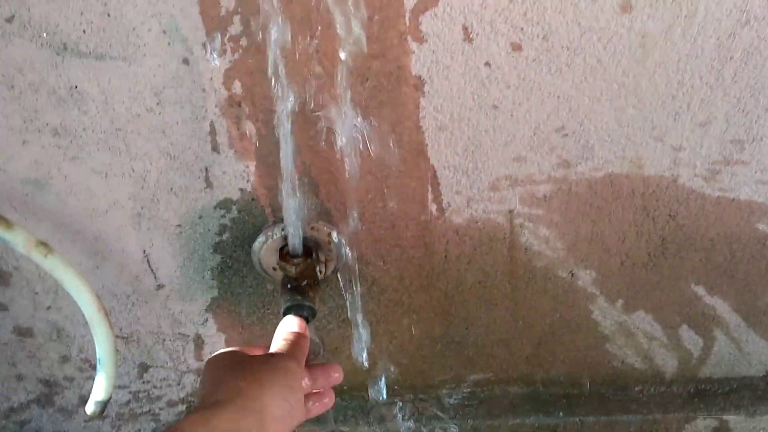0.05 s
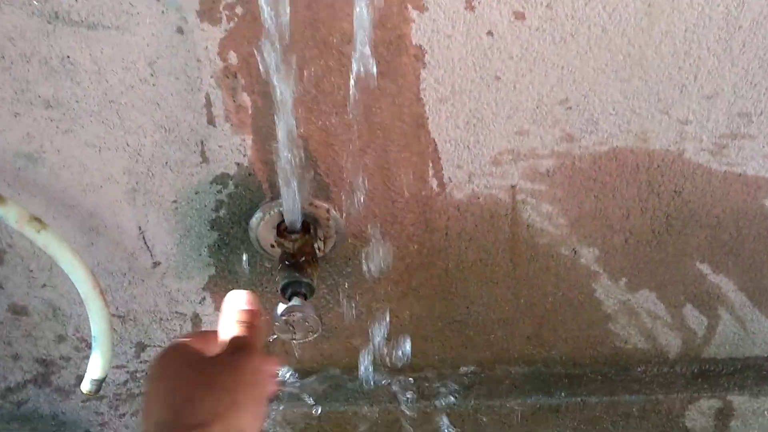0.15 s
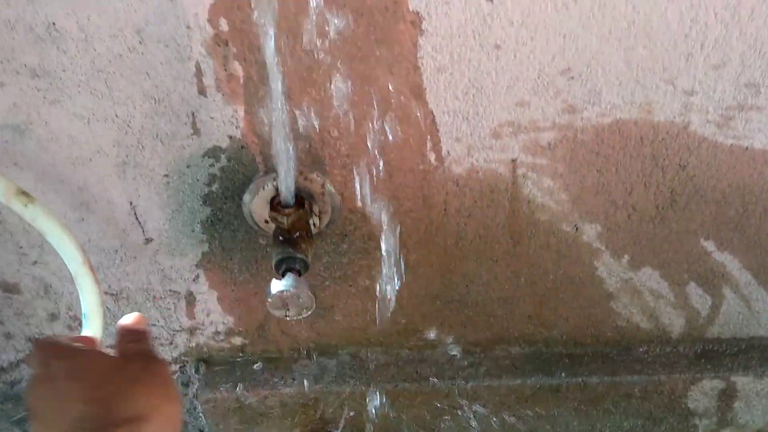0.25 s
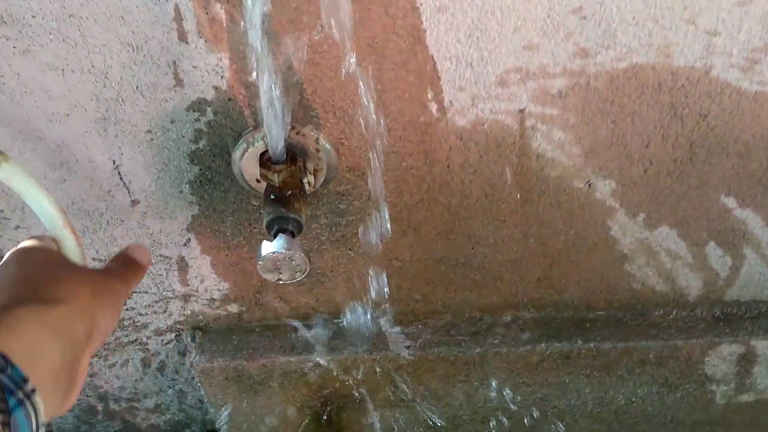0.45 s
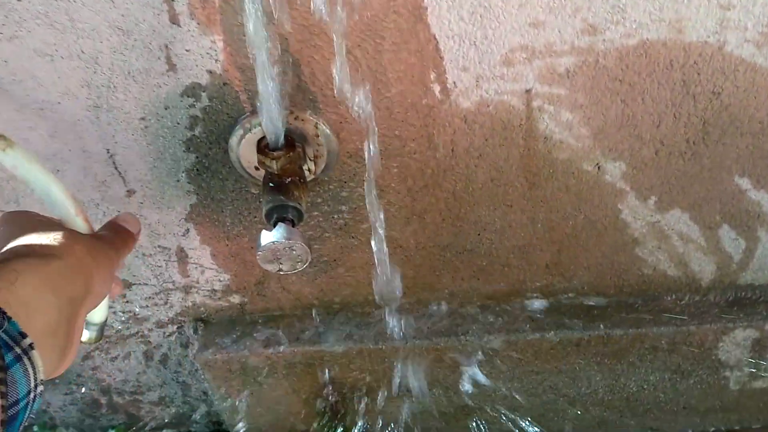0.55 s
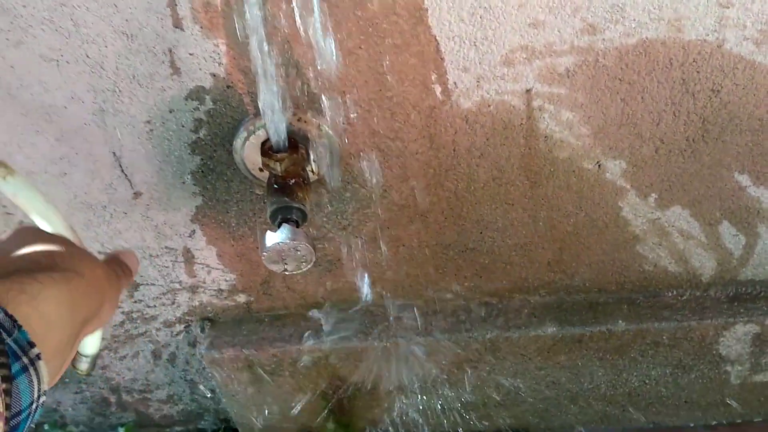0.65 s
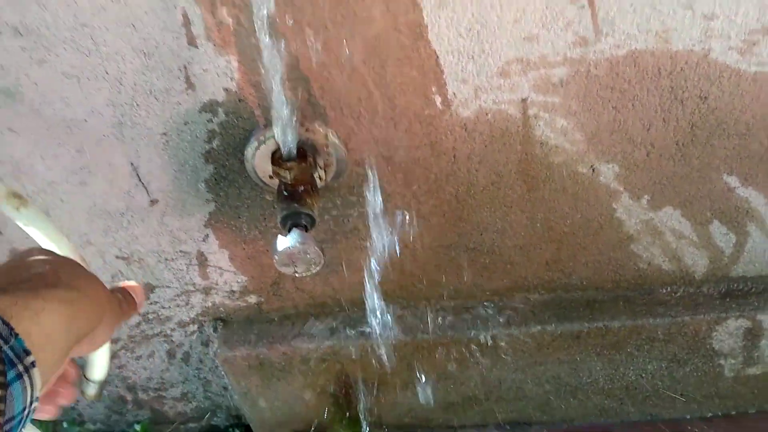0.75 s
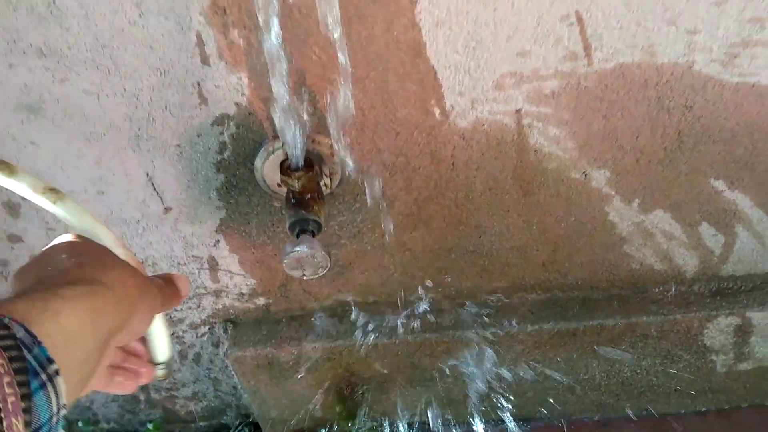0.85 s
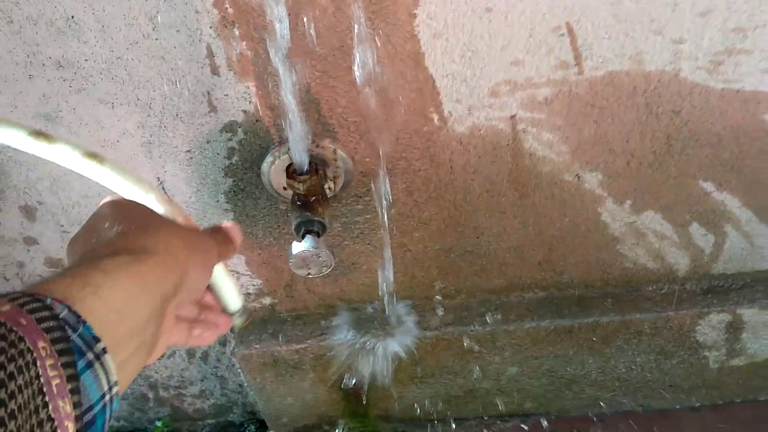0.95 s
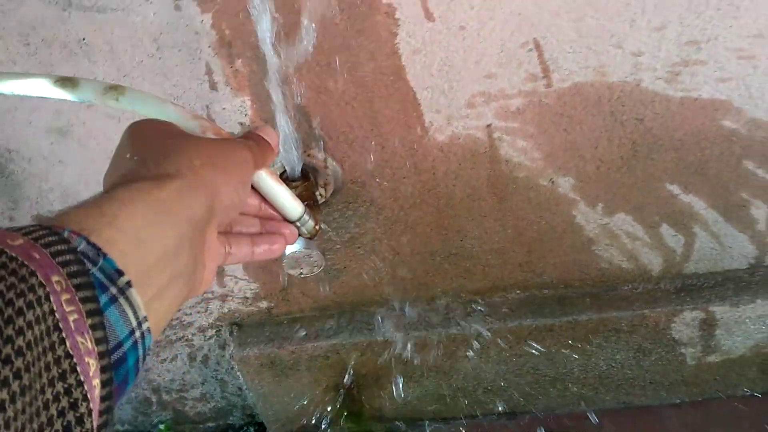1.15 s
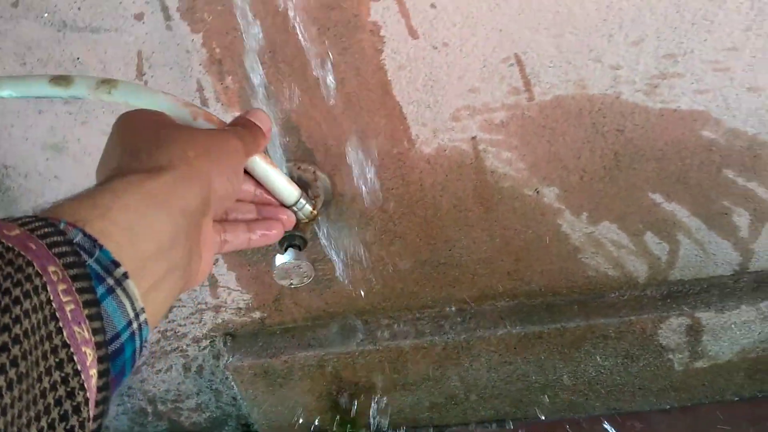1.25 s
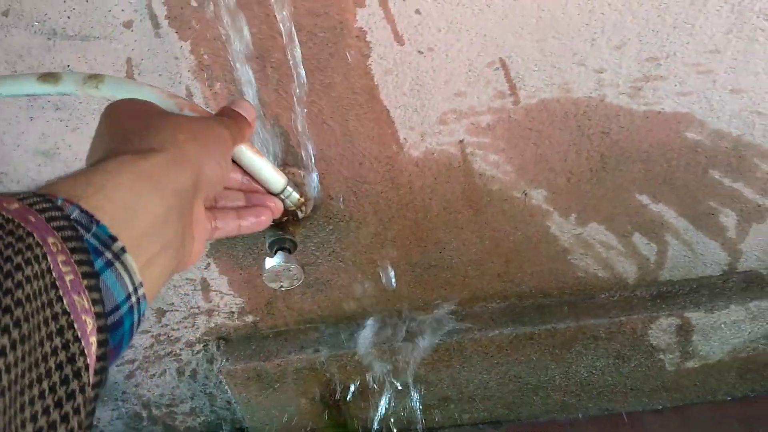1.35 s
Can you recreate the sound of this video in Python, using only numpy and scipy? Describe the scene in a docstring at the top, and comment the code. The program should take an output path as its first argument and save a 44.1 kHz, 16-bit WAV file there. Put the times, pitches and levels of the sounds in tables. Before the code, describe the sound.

Close by and a little to the right, water from an outdoor tap splashes onto concrete in quick, irregular spurts. Droplets patter and a thin trickle runs between the splashes, with a short yard echo and faint low rumble.

```python
"""In a small hard yard, water spurts unevenly from a wall tap onto a concrete ledge, a little to the right.
Each slug lands with sharp slaps and a soft thud and scatters droplets; trapped air rings as plops.
A thin trickle runs throughout, and stray drops land further right. A hard surface nearby throws each
slap back, and walls and ground reverberate. A low rumble and a faint tone lie underneath."""
import sys
import numpy as np
from scipy import signal
from scipy.fft import irfft
from scipy.io import wavfile

SR = 44100
rng = np.random.default_rng(int(sys.argv[2]) if len(sys.argv) > 2 else 0)


def to_wav(s):
    """Save 16-bit WAV."""
    ch = np.atleast_2d(s).T  # columns
    pcm = np.round(np.clip(ch, -1, 1) * 32767)  # PCM
    wavfile.write(sys.argv[1], SR, pcm.astype(np.int16))


N = 61739

# Levels in the tables are relative: gains and filters follow.
# spectrum of the background rumble: f/Hz, level/dB
RUMBLE_SPECTRUM = [(25, -50), (60, -53), (90, -13.5), (130, 4.5), (190, -16), (300, -27.5), (550, -12.5),
                   (900, -24.5), (2000, -26), (16000, -65)]
# envelope of the unbroken trickle: t/s, level/dB
TRICKLE_ENVELOPE = [(0, -60.5), (.07, -72.5), (.14, -62), (.41, -64.5), (.52, -56), (.69, -49.5),
                    (.81, -56), (.99, -68.5), (1.28, -61.5), (1.4, -68)]
# filter that colours the droplet ticks: f/Hz, level/dB
DROPLET_SPECTRUM = [(200, -21), (550, -12), (1200, -17), (2000, -1.5), (3500, -1), (4400, 4.5), (7900, 1.5),
                    (8800, -10.5), (16000, -20.5)]
# stray drops landing further right: t/s, level/dB, f/Hz
STRAY_DROPS = [(.0105, -37, 6610), (.0205, -34, 5870), (.0947, -37.5, 5320), (.1493, -31.5, 5150),
               (.5422, -26, 5180), (.8442, -37.5, 5900), (.885, -31, 5730), (.889, -30.5, 6800),
               (1.1915, -20.5, 6490), (1.2438, -28, 4730), (1.2795, -25.5, 4350)]
# spectrum of the crackle in an impact: f/Hz, level/dB
SPLASH_SPECTRUM = [(150, -33), (800, -13), (2000, -7.5), (3050, 8.5), (3600, -14), (4300, 1.5),
                   (5800, -1.5), (7900, -9), (12500, -10.5), (16000, -47)]
# bright spits of mist: t/s, level/dB
MIST_SPITS = [(.0947, -50.5), (.222, -39.5), (.305, -33), (.456, -31), (.570, -40), (.619, -37),
              (.628, -50), (.889, -42.5), (1.2438, -41)]
# sheets of spray: t/s, time until fading/s, level/dB, right minus left/dB
SPRAY_SHEETS = [(0.154, 0.082, -59.5, 14), (0.2, 0.045, -43, 4.5), (0.245, .016, -34, 1.5),
                (0.292, 0.021, -34.5, -3), (0.339, 0.0079, -37, 10), (0.429, 0.047, -35, -5),
                (0.565, 0.048, -44.5, 14), (0.621, 0.024, -39, -12.5), (0.722, 0.0086, -42, -3),
                (0.764, 0.0049, -33, -11.5), (0.905, 0.024, -42, -5.5), (0.929, 0.029, -47, 3.5),
                (0.994, 0.0058, -55, 5), (1.075, 0.055, -32.5, -5)]
# air pockets closing under the water: t/s, level/dB, starting f/Hz, decay time/cycles
AIR_POCKETS = [(.193, -38.5, 1774, 23), (.197, -32.5, 2690, 3.9), (.2005, -61, 1870, 7.5),
               (.306, -28, 2620, 13.3), (.440, -36.5, 1890, 4), (.5705, -37, 2960, 14),
               (.576, -44, 1420, 22), (.620, -35, 2970, 5), (.7035, -27.5, 1133, 3.6),
               (.707, -31, 2000, 4.4), (.7115, -32, 1490, 6.8), (.723, -35, 1670, 7.3),
               (.731, -23, 1940, 2.7), (.738, -34, 1905, 5.5), (1.0655, -24.5, 1510, 2.1),
               (1.067, -14.5, 2744, 3.9), (1.1065, -23, 1804, 4.2), (1.351, -40, 1760, 23)]
# slugs of water striking the ledge: t/s, level/dB, f/Hz
SLUG_IMPACTS = [(.222, -17.5, 4460), (.2535, -23, 5500), (.2585, -15, 5430), (.265, -24, 5050),
                (.2972, -15, 5900), (.305, -8.5, 5500), (.3435, -26, 5100), (.3466, -19.5, 4980),
                (.4386, -12.5, 5670), (.4464, -18, 5300), (.4564, -17.5, 7140), (.4655, -21, 5170),
                (.479, -23.5, 5050), (.570, -20.5, 4630), (.5912, -17, 5740), (.6072, -21, 5130),
                (.619, -7.5, 5120), (.627, -12, 5770), (.6485, -11.5, 5920), (.7305, -20, 4770),
                (.7648, -13, 4596), (.7715, -14, 4540), (.9165, -17, 6420), (.9325, -16, 5450),
                (.940, -24.5, 5230), (.952, -27, 5520), (1.0475, -31, 4750), (1.0540, -17.5, 4440),
                (1.0665, -9, 4170), (1.0942, -14, 5000), (1.1062, -10.5, 3207), (1.121, -10, 4270),
                (1.129, -28, 3840)]
# swells of the faint tone: start t/s, end t/s
TONE_SWELLS = [(.235, .35), (.37, .52)]

BASS_CUT_HZ, LEDGE_CUT_HZ, SPIT_CUT_HZ, BAND_EDGE_HZ = 74, 620, 8300, 16300
RUMBLE_DB, RUMBLE_COHERENCE = -66.5, 0.91
BUBBLE_CYCLES, BUBBLE_RISE = 8, .2
DROPS_PER_S, BUBBLES_PER_S, CLUMP_DB, CLUMP_S = 3100, 580, 1.8, .002
SPRAY_RISE_S, SPRAY_FADE_DB_PER_S = 0.0084, 940
SLAP_RISE_S, SLAP_DECAY_S, TICK_DECAY_S, SPIT_DECAY_S = .0008, 0.0019, .0003, 0.0031
FOCUS_DB, FOCUS_OCTAVES, RIPPLE_DB, RIPPLE_HZ = 24.5, 0.73, 4, 600
THUD_DB, THUD_HZ, THUD_DECAY_S = -64.5, 164, 0.021
TONE_DB, TONE_HZ = -59, 521
LEFT_LAG_S, SLAP_LEFT_DB, PLOP_LEFT_DB, DRIP_LEFT_DB = .00026, -15.5, 5.5, -4.5
ECHO_S, ECHO_DB = 0.0089, -11.5


def amp(db):
    """Amplitude ratio of a level in decibels."""
    return 10 ** (np.asarray(db) / 20)


def unit_rms(x):
    """Normalisation to an rms of 1."""
    return x / np.sqrt(np.mean(x ** 2) + 1e-20)


def level_at(spectrum, hz):
    """Level in dB, interpolated along a logarithmic frequency axis."""
    f, db = np.transpose(spectrum)
    return np.interp(np.log(hz + 1), np.log(f + 1), db)


def delayed(x, s):
    """A pure delay of s seconds."""
    return np.concatenate([np.zeros(round(s * SR)), x])[:N]


def high_pass(x, hz):
    """Second-order Butterworth attenuation below hz."""
    return signal.sosfilt(signal.butter(2, hz, "high", fs=SR, output="sos"), x)


def coloured(x, spectrum):
    """Minimum-phase filtering: the phase follows from the log gain by a Hilbert transform."""
    log_gain = np.log(amp(level_at(spectrum, abs(np.fft.fftfreq(2048, 1 / SR)))))
    response = np.exp(np.conj(signal.hilbert(log_gain)))
    return signal.fftconvolve(x, np.fft.ifft(response).real[:1024])[:len(x)]


def noise(db, size):
    """Random-phase noise of rms 1, shaped by a level for each frequency bin."""
    return unit_rms(irfft(amp(db) * np.exp(2j * np.pi * rng.random(len(db))), size))


def rumble():
    """Partial coherence: low noise, most of its power common to both sides."""
    db = level_at(RUMBLE_SPECTRUM, np.fft.rfftfreq(N, 1 / SR))
    common = np.sqrt(RUMBLE_COHERENCE) * noise(db, N)
    separate = np.sqrt(1 - RUMBLE_COHERENCE) * np.array([noise(db, N), noise(db, N)])
    return amp(RUMBLE_DB) * (common + separate)


def bubble(t, hz, cycles):
    """Damped resonance of trapped air, its pitch rising as the bubble nears the surface."""
    turns = np.maximum(t, 0) * hz
    pitch = hz * (1 + BUBBLE_RISE * np.tanh(2 * turns / cycles))
    envelope = np.tanh(turns) * np.exp(-(turns / cycles) ** 2)
    return envelope * np.sin(2 * np.pi * np.cumsum(pitch) / SR)


def patter(pitches, per_s, grain):
    """A Poisson process of grains, each given a direction by level and time differences."""
    out = np.zeros((2, N))
    for hz in pitches:
        at = np.nonzero(rng.random(N) < per_s / len(pitches) / SR)[0]
        strength = amp(np.minimum(rng.exponential(1, N)[at], 3))
        pan, lag = rng.random(N)[at], rng.integers(-6, 14, N)[at]
        impulses = np.zeros((2, N))
        impulses[0, (at + lag) % N] = strength * np.sqrt(pan)
        impulses[1, at] = strength * np.sqrt(1 - pan)
        out += signal.oaconvolve(impulses, grain(hz)[None], axes=1)[:, :N]
    return out


def droplets():
    """Impact ticks and resonating bubbles, clumped by random amplitude modulation."""
    t = np.arange(512) / SR
    ticks = patter(np.linspace(300, BAND_EDGE_HZ, 24), DROPS_PER_S,
                   lambda hz: t * np.exp(-t / 0.00013) * np.sin(2 * np.pi * (hz * t + rng.random())))
    ticks = np.array([unit_rms(coloured(side, DROPLET_SPECTRUM)) for side in ticks])
    bubbles = patter(np.geomspace(3520, 6790, 24), BUBBLES_PER_S,
                     lambda hz: bubble(t, hz, BUBBLE_CYCLES))
    clumps = np.interp(np.arange(N) / SR / CLUMP_S, np.arange(N), rng.standard_normal(N))
    return unit_rms((ticks + amp(-4) * unit_rms(bubbles)) * amp(CLUMP_DB * np.clip(clumps, -2, 2)))


def spray():
    """Incoherent sources add in power: a thin trickle and the sheets of droplets from the slugs."""
    t = np.arange(N) / SR
    power = np.ones((2, 1)) * amp(np.interp(t, *np.transpose(TRICKLE_ENVELOPE))) ** 2
    for start, length, db, right_db in SPRAY_SHEETS:
        rise = np.clip((t - start) / SPRAY_RISE_S, 0, 1)
        fade = amp(db - SPRAY_FADE_DB_PER_S * np.maximum(t - start - length, 0))
        power += (rise * fade * amp([[-right_db / 2], [right_db / 2]])) ** 2
    return high_pass(np.sqrt(power) * droplets(), BASS_CUT_HZ)


def slap(db, hz, size=1024):
    """A brief impact is broadband: a tick, a crackle and ring around hz, then five entrained bubbles."""
    t, f = np.arange(size) / SR, np.fft.rfftfreq(size, 1 / SR)
    envelope = (1 - np.exp(-(t / SLAP_RISE_S) ** 2)) * np.exp(-t / SLAP_DECAY_S)
    envelope /= envelope.max()
    focus = FOCUS_DB * np.exp(-(np.log2((f + 1) / hz) / FOCUS_OCTAVES) ** 2)
    ripple = RIPPLE_DB * np.interp(f / RIPPLE_HZ, np.arange(size), rng.standard_normal(size))
    crackle = noise(level_at(SPLASH_SPECTRUM, f) + focus + ripple, size)
    ring = 0.6 * np.sin(2 * np.pi * hz * t)
    burst = unit_rms(envelope * (crackle + ring)) * np.sqrt(np.mean(envelope ** 2) / 2)
    tick = np.exp(-t / TICK_DECAY_S) * high_pass(noise(ripple, size), hz)
    bubbles = np.zeros(size)
    for late in rng.random(5):  # within 9 ms; the later, the weaker
        final_hz = hz * 2 ** (.3 * rng.standard_normal())
        bubbles += (1 - late) * bubble(t - late * .009, final_hz / (1 + BUBBLE_RISE), BUBBLE_CYCLES)
    return amp(db - 1) * (burst + amp(-14) * tick + amp(-13) * bubbles)


def landings(events, sound, left_db):
    """Path differences: sound from the ledge arrives first on the right, its echo later on the left."""
    right = np.zeros(N)
    for start, *settings in events:
        event = sound(*settings)
        span = right[round(start * SR):][:len(event)]
        span += event[:len(span)]
    left = amp(left_db) * delayed(right, LEFT_LAG_S) + amp(ECHO_DB) * delayed(right, ECHO_S)
    return high_pass(np.array([left, right]), LEDGE_CUT_HZ)


def reflections(x, db, t60_s, size=16384):
    """Diffuse reflections from walls and ground decay exponentially, uncorrelated between the sides."""
    t = np.arange(size) / SR
    taps = rng.standard_normal((2, size)) * (rng.random((2, size)) < .15)
    taps *= (t > .002) * amp(-60 * t / t60_s)
    taps /= np.linalg.norm(taps, axis=1, keepdims=True)
    source = (x[1] + delayed(x[0], 0.001)) / np.sqrt(2)
    return amp(db) * signal.fftconvolve(source[None], taps, axes=1)[:, :N]


def in_yard(x):
    """Double-slope reverberation: direct sound plus near and far reflections."""
    return x + reflections(x, db=-5.5, t60_s=0.063) + reflections(x, db=-30, t60_s=0.82)


def spit(db, size=1024):
    """Small sources sound high: a puff of the finest droplets crackles in the treble."""
    t = np.arange(size) / SR
    crackle = unit_rms(rng.standard_normal(size) * rng.standard_normal(size))
    puff = crackle * np.exp(-t / SPIT_DECAY_S)
    return amp(db) * high_pass(high_pass(puff, SPIT_CUT_HZ), SPIT_CUT_HZ)


def plop(db, hz, cycles, size=2048):
    """An air pocket resonates; the shorter it lives, the more the churning water roughens it."""
    t, f = np.arange(size) / SR, np.fft.rfftfreq(size, 1 / SR)
    ring = bubble(t, hz, cycles)
    envelope = abs(signal.hilbert(ring))
    churn = noise(-24 * abs(np.log2((f + 1) / hz)), size)  # 24 dB per octave either side
    return amp(db + 2) * (ring + 1.3 / cycles * envelope * churn)


def thud(water):
    """Momentum transfer: the water drums on the ledge as low noise that follows the splashes' power."""
    pole = np.exp(-2 / (THUD_DECAY_S * SR))
    power = signal.lfilter([1 - pole], [1, -pole], (water ** 2).mean(0))
    envelope = np.sqrt(power) ** 0.43  # compressed: the thud varies less than the splashes
    octaves = np.log2((np.fft.rfftfreq(N, 1 / SR) + 1) / THUD_HZ)
    drumming = noise(-20 * np.log10(1 + octaves ** 2), N)
    return high_pass(amp(THUD_DB) * unit_rms(envelope * drumming), BASS_CUT_HZ)


def hollow_tone():
    """Odd harmonics sound hollow: a faint fundamental and its third harmonic swell twice."""
    t = np.arange(N) / SR
    swell = sum(np.sin(np.pi * np.clip((t - start) / (end - start), 0, 1)) for start, end in TONE_SWELLS)
    phase = 2 * np.pi * TONE_HZ * t
    return amp(TONE_DB) * swell * (np.sin(phase) + amp(-12) * np.sin(3 * phase))


def scene():
    """Superposition of the reverberant water sounds with the thud, the rumble and the tone."""
    slaps = landings(SLUG_IMPACTS, slap, SLAP_LEFT_DB)
    spits = landings(MIST_SPITS, spit, SLAP_LEFT_DB)
    plops = landings(AIR_POCKETS, plop, PLOP_LEFT_DB)
    water = slaps + spits + plops + spray()
    drips = amp([[DRIP_LEFT_DB], [0]]) * in_yard(landings(STRAY_DROPS, slap, SLAP_LEFT_DB))
    return in_yard(water) + drips + thud(water) + rumble() + hollow_tone()


def record(dry):
    """Band limiting by a linear-phase low-pass filter."""
    taps = signal.firwin(511, BAND_EDGE_HZ, window=("kaiser", 9), fs=SR)
    return signal.oaconvolve(dry, taps[None], "same")


dry = scene()
out = record(dry)
to_wav(out)
```